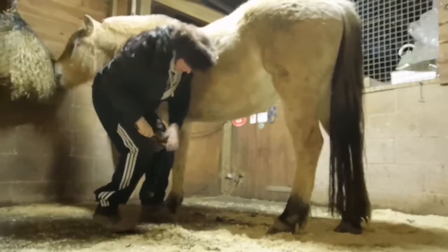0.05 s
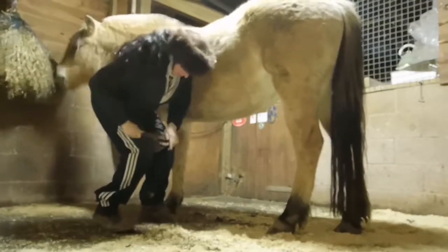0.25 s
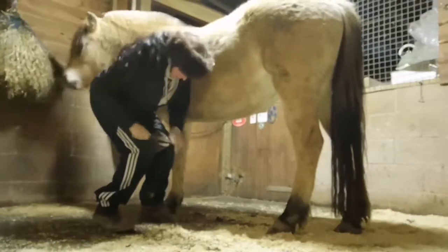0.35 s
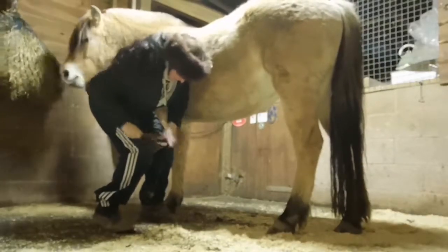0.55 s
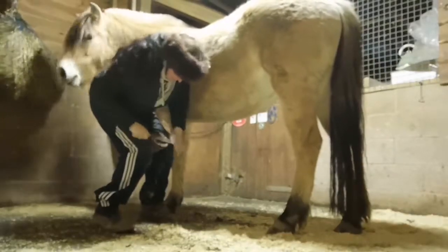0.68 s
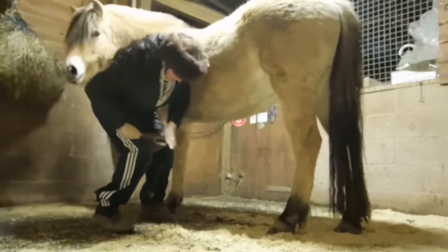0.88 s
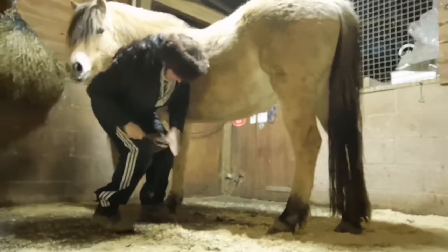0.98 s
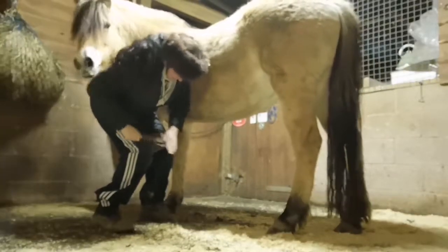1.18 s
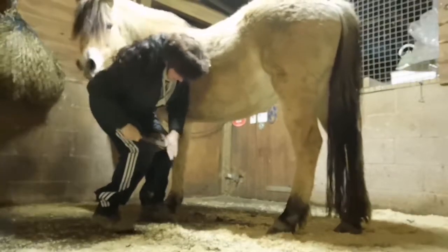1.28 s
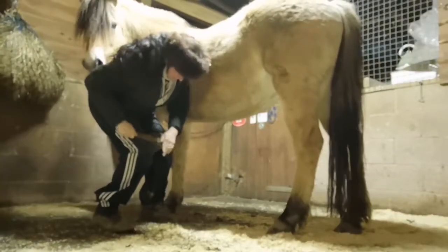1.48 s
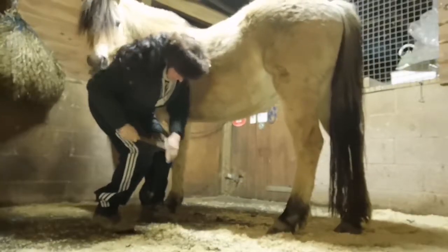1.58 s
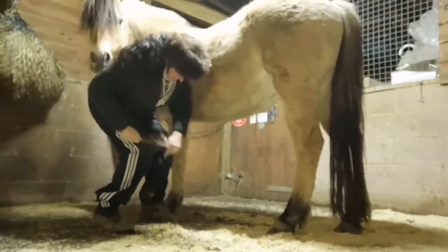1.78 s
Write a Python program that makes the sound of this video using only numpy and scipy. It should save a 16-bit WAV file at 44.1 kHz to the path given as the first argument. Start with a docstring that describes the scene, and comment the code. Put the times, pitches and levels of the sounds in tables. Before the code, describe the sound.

A metal rasp works on a horse's hoof in a quiet stable. After faint hiss and low rumble, it touches with a dull thud at 0.15 seconds and a bright ringing clink at 0.2, then smaller knocks until 0.4. Dry, gritty scrapes follow about every 0.16 seconds until 1.37, with hollow low judder. Near quiet follows, then one lighter scrape at 1.7. Short stall reflections.

```python
"""A quiet stable: a steel rasp is set on a hoof, clinks against metal and is then worked to and fro.
Its teeth scrape the horn in dense tiny clicks, ring the damped bar and shake the hoof into a low judder.
Blows crack, ring the bar and thud on the hoof; the work also sends a dull low push through leg and floor.
The stall adds a short tail of reflections. Below lie a faint hiss, a wavering hum and a deep rumble,
with two spaced microphones hearing nearly the same bass."""
import sys
import numpy as np
from scipy import signal
from scipy.fft import rfft, irfft
from scipy.io import wavfile
from scipy.ndimage import uniform_filter1d

SR = 44100
rng = np.random.default_rng(int(sys.argv[2]) if len(sys.argv) > 2 else 0)


def to_wav(s):
    """Save 16-bit WAV."""
    ch = np.atleast_2d(s).T  # columns
    pcm = np.round(np.clip(ch, -1, 1) * 32767)  # PCM
    wavfile.write(sys.argv[1], SR, pcm.astype(np.int16))


N = 81585
T = np.arange(N) / SR  # time of each sample [s]
HZ = np.fft.rfftfreq(N, 1 / SR)  # frequency of each spectrum bin [Hz]


def amp(db):
    """Turns decibels into a gain."""
    return 10 ** (np.asarray(db) / 20)


def evened(x):
    """Scales a sound to an average (rms) strength of 1."""
    return x / np.sqrt(np.mean(x ** 2) + 1e-20)


def noise(*size):
    """Plain random noise."""
    return rng.standard_normal(size)


def read(points, hz):
    """Reads a curve between its points, along a logarithmic frequency axis."""
    f, value = np.transpose(points)
    return np.interp(np.log(hz + 1), np.log(f + 1), value)


def shape(x, gain):
    """Filters a sound by a gain for each frequency."""
    return irfft(rfft(x) * gain, N)


def pair(a, b):
    """Mixes two streams into left and right, as alike as the two microphones hear each pitch."""
    # How alike left and right are: (frequency [Hz], likeness [-1 to 1])
    likeness = [(60, 1), (230, 1), (340, -.8), (600, -.5), (1000, 0), (1450, -.5), (2400, .1), (4400, -.1),
                (14900, 0)]
    # How much louder the left is: (frequency [Hz], left over right [dB])
    left_excess = [(60, 0), (220, 0), (380, 1.5), (700, 3), (1290, -1), (2370, 3.5), (4380, 0), (8080, -2),
                   (14900, 0)]
    same = np.clip(read(likeness, HZ), -1, 1)
    lean = amp(read(left_excess, HZ) / 2)
    left = shape(a, lean)
    right = shape(a, same / lean) + shape(b, np.sqrt(1 - same ** 2) / lean)
    return np.array([left, right])


def stall(x):
    """The walls send back sparse random reflections, and each pitch dies away at its own speed."""
    # Time the reflections take to fall by 60 dB: (frequency [Hz], time [s])
    decay_times = [(200, 0.1), (1000, 0.19), (4000, 0.18), (12000, 0.13)]
    # one reflection at a random place in every 20 samples
    slots = np.arange(250, SR // 2, 20)
    places = slots + rng.integers(0, 20, (2, len(slots)))
    signs = rng.choice([-1., 1.], (2, len(slots)))
    taps = np.zeros((2, SR // 2 + 20))
    np.put_along_axis(taps, places, signs, 1)
    hz, t, z = signal.stft(taps, SR, nperseg=256)
    fade = amp(-60 * t / read(decay_times, hz)[:, None])
    tail = signal.istft(z * fade, SR, nperseg=256)[1]
    return signal.fftconvolve(x, tail / np.linalg.norm(tail[0]), axes=1)[:, :N]


def air():
    """Noise is filtered into an uneven hiss, a wavering hum and a rumble; the last two are equal in both ears."""
    # Colour of the hiss: (frequency [Hz], relative level [dB])
    hiss_colour = [(12, -34), (20, -14), (82, 4), (132, -11.5), (331, -14.5), (413, -18.5), (577, -23.5),
                   (1160, -23.5), (1520, -24.5), (5470, -33), (5950, -36), (7640, -27), (15300, -50.5)]
    # Deep rumble before a 0.5 dB lift: (time [s], level [dB])
    rumble_level = [(0.0, -63), (0.246, -59), (0.4, -46), (0.432, -54.5), (0.602, -45), (0.658, -56),
                    (1.216, -47.5), (1.23, -59), (1.85, -54.5)]
    hiss_db, drift_db = -58, 1.
    hum_hz, hum_width_hz, hum_db = 107.3, 14, -60.5
    drift = evened(shape(noise(N), HZ < 8))  # slow ups and downs
    hiss = shape(noise(2, N) * amp(drift_db * drift), amp(read(hiss_colour, HZ)) * (HZ > 20))
    hiss = amp(hiss_db) * evened(pair(*hiss))
    hum = evened(shape(noise(N), 1 / (1 + (2 * (HZ - hum_hz) / hum_width_hz) ** 2)))
    rumble = evened(shape(noise(N), (HZ > 18) / (1 + (HZ / 45) ** 3)))
    rumble *= amp(np.interp(T, *np.transpose(rumble_level)) + 0.5)
    return hiss + amp(hum_db) * hum + rumble


def push():
    """Dull noise around 125 Hz that the work sends through the leg and floor."""
    # Strength of the push: (time [s], level [dB])
    push_level = [(0.15, -52), (0.172, -58), (0.262, -86), (0.32, -54.5), (0.376, -76), (0.41, -59.5),
                  (1.1, -56), (1.158, -39), (1.2, -61.5), (1.66, -70), (1.796, -54.5), (1.85, -79)]
    low = evened(shape(noise(N), 1 / (1 + ((HZ - 125) / 45) ** 4)))
    return low * amp(np.interp(T, *np.transpose(push_level), left=-90))


def judder():
    """The hoof shakes in a narrow wandering band: returns the shaking at even strength, and its gain."""
    # Shaking of the hoof: (time [s], level [dB], frequency [Hz])
    hoof_shaking = [(0.15, -76, 216.7), (0.164, -52.5, 218.2), (0.238, -66, 218), (0.414, -67, 205.2),
                    (0.556, -50.5, 225.3), (0.604, -90, 218.5), (0.666, -49, 225.3), (0.688, -47, 225.3),
                    (0.722, -41, 224.4), (0.756, -64, 224.4), (0.84, -41, 227.5), (0.916, -48, 232.2),
                    (0.936, -65, 226), (0.954, -49, 225.2), (1.062, -58, 225), (1.12, -35, 220.2),
                    (1.214, -48.5, 226.4), (1.248, -68, 222), (1.294, -50, 226.7), (1.348, -48, 226.2),
                    (1.466, -72, 211.3), (1.48, -66, 209.4), (1.722, -72.5, 204.5), (1.806, -53, 218.9),
                    (1.85, -61, 205.6)]
    width_hz = 47  # width of each of the two smoothing stages
    s, db, hz = np.transpose(hoof_shaking)
    turn = np.exp(2j * np.pi * np.cumsum(np.interp(T, s, hz)) / SR)
    r = np.exp(-np.pi * width_hz / SR)
    slow = signal.lfilter([1], [1, -2 * r, r * r], noise(N) + 1j * noise(N))
    shake = (turn * slow / abs(slow) ** .6).real  # the division calms the swings in strength
    return evened(shake), amp(np.interp(T, s, db, left=-90))


def arch(start, length, peak):
    """Pressure of one stroke: up to its peak and down again."""
    u = np.clip((T - start) / length, 0, 1)
    peak = np.clip(peak, .05, .95)
    return np.sin(np.pi / 2 * np.minimum(u / peak, (1 - u) / (1 - peak)))


def patchy(x):
    """The colour shifts in random patches of time and pitch as other teeth meet the horn."""
    patchy_db = 3.
    z = signal.stft(x, nperseg=256)[2]
    spots = noise(*z.shape[1:])
    spots = uniform_filter1d(spots, size=3, axis=0)
    spots = evened(uniform_filter1d(spots, size=10, axis=1))
    return signal.istft(z * amp(patchy_db * spots), nperseg=256)[1][:, :N]


def rasp():
    """Teeth bite in dense clicks, pulsed by the judder of the hoof, and ring the held bar."""
    # Strokes and light drags: (start [s], length [s], level [dB], body [dB], treble [dB],
    # place of the peak [0-1], ring [dB])
    strokes = [(0.152, 0.17, -49.5, -8.5, -31.5, .06, 2.5), (0.284, 0.18, -54, -7, 4, 0.29, -3.5),
               (0.444, 0.15, -41.5, 1, 1.5, 0.49, -3), (0.609, 0.14, -44, 6, 0, 0.66, 2.5),
               (0.766, 0.13, -39.5, 5.5, 3.5, 0.63, -2.5), (0.922, .14, -42.5, 5, 0, 0.52, 2),
               (1.064, 0.14, -38.5, 3, 2, 0.56, -5), (1.247, 0.12, -43.5, 4, -2.5, 0.55, -4),
               (1.365, 0.086, -65.5, 4, -5, .3, -4.5), (1.458, 0.27, -66.5, -1, -0.5, 0, -10.5),
               (1.705, 0.15, -44.5, -9, -0.5, 0.28, 2)]
    # Colour of the scraping: (frequency [Hz], relative level [dB])
    scrape_colour = [(160, -24.5), (280, -2.5), (326, -14), (529, -6), (790, -15.5), (935, -11.5),
                     (1330, -12.5), (2470, -3.5), (3170, -11.5), (3940, -14), (7700, -14), (15300, -40.5)]
    # Resonances of bar and horn under the teeth: (frequency [Hz], width [Hz], level [dB])
    held_modes = [(404.9, 50, 7.5), (514, 29, -4.5), (1015, 14, -4), (1162, 42, 3.5), (1583, 99, -2.5),
                  (1760, 130, 0), (2420, 97, 0.5), (3810, 400, 2), (4320, 63, 2.5), (5480, 42, 0),
                  (7020, 72, -15), (7910, 270, -5)]
    bites_per_s, bite_spread_db, judder_depth = 9000, 1.6, 0.1
    body_hz, treble_hz = 900, 4640  # body lies below the first, treble above the second
    grip_spread_db = 2.5  # each stroke rings the held bar a little differently
    ring_power, hiss_power = .6, 1.2  # the ring follows the pressure flatly, the hiss steeply
    wet_db = -7

    sizes = amp(bite_spread_db * np.minimum(rng.exponential(1, (2, N)), 4))
    bites = sizes * rng.choice([-1., 1.], (2, N)) * (rng.random((2, N)) < bites_per_s / SR)
    shake, shake_level = judder()
    bites = evened(bites) * (1 + judder_depth * shake)

    colour = amp(read(scrape_colour, HZ))
    colour = colour / np.sqrt(np.mean(colour ** 2))
    held = np.array([amp(db) / (1 + 2j * (HZ - f) / width) for f, width, db in held_modes])
    grips = amp(grip_spread_db * noise(len(strokes), len(held_modes)))
    low = 1 / (1 + (HZ / body_hz) ** 4)
    high = 1 / (1 + (treble_hz / (HZ + 1)) ** 4)

    teeth = np.zeros((2, N))
    for (start, length, db, body_db, treble_db, peak, ring_db), grip in zip(strokes, grips):
        press = arch(start, length, peak)
        tone = colour * amp(db + body_db * low + treble_db * high)
        teeth += shape(bites * press ** ring_power, tone * (grip @ held) * amp(ring_db))
        teeth += shape(bites * press ** hiss_power, tone)
    teeth = patchy(teeth)
    return pair(*(teeth + amp(wet_db) * stall(teeth))) + shake * shake_level


def blows():
    """Each blow cracks, rings the bar (soft contacts mostly its low modes), rattles and thuds on the hoof."""
    # Blows on the bar: (time [s], bar level [dB], contact roll-off [Hz],
    # struck on edge or face [above 0.5 = face], crack [dB], thud [dB])
    hits = [(0.156, -71, 4450, 1, -77, -51), (.1642, -41, 4200, 1, -60, -30),
            (.2074, 0, 30000, 0, -28, -52), (.3075, -34, 2600, 1, -48, -45),
            (.3340, -34, 20000, 1, -41, -48), (.385, -42.5, 2591, 0.64, -66, -61)]
    # Bending modes of the bar; an edge blow adds a snap that the grip kills at once. A t60 is the time
    # to fall by 60 dB: (frequency [Hz], snap [dB], snap t60 [s], ring on edge [dB], ring on face [dB],
    # ring t60 [s], left over right [dB], left lead [rad])
    bar_modes = [(1570, -40, .03, -50, -10, .1, 2, 2.5), (2150, -30, .03, -44, -10, .1, 3, 2),
                 (2400, -27, .03, -42, -4, .14, 4, 1.9), (3264, -40, .03, -33, -12, .25, 4, -1.2),
                 (4362, -22, .045, -38, -10, .16, 4, 2.7), (5525, -25, .04, -33, -5, .16, -3, -1.9),
                 (5688, -25, .04, -37, -10, .17, -2, -1.9), (6937, -11, .05, -34, 1, .17, -12, -2.3),
                 (7750, -24, .03, -40, -13, .12, -8, -2.3), (8351, -1, .022, -29, -7, .18, -7, 1.1),
                 (9647, -36, .04, -38, -12, .15, 9, .3), (9900, -30, .03, -44, -16, .08, 5, .3),
                 (11200, -29, .045, -55, -40, .1, -2, -2.9), (13740, -39, .04, -48, -26, .12, 3, 3)]
    # Colour of the crack: (frequency [Hz], relative level [dB])
    crack_colour = [(800, -31), (2300, -1), (5000, -8.5), (8000, 4), (10000, -0.5), (10800, -32.5),
                    (15000, -40)]
    # Thud gain, one row per side, left then right: (gain [times])
    thud_sides = [
        [1.],
        [-.5],
    ]
    contact_s = .0019  # sets how softly ring and crack swell
    chatter_db, chatter_t60 = -43, .12  # the bar rattles against the horn; t60 in s
    crack_t60, thud_hz, thud_t60 = .15, 480, 0.037  # t60 in s
    wet_db = -11

    out = np.zeros((2, N + SR))
    t = T[:SR // 2]
    hz, snap_db, snap_t60, edge_db, face_db, t60, lean_db, lead = np.array(bar_modes).T[:, :, None]
    side = np.array([.5, -.5])[:, None, None]
    rise = 1 - np.exp(-(t / contact_s) ** 2)
    on_edge = amp(snap_db - 60 * t / snap_t60) + amp(edge_db - 60 * t / t60)
    on_face = amp(face_db - 60 * t / t60)
    grit = evened(shape(noise(len(hits), 2, N), amp(read(crack_colour, HZ))))[:, :, :len(t)]
    rattle = noise(len(hits), len(bar_modes), len(t)) * amp(chatter_db - 60 * t / chatter_t60)

    for (s, level_db, soft_hz, face, crack_db, thud_db), rough, knocks in zip(hits, grit, rattle):
        size = amp(side * lean_db) / (1 + (hz / soft_hz) ** 4)
        size = size * (on_face if face > .5 else on_edge)
        ring = size * np.sin(2 * np.pi * hz * t + side * lead)
        # each knock of the rattle starts the ring again
        rattling = signal.fftconvolve(ring, knocks[None] * rise, axes=2)[:, :, :len(t)]
        bar = (ring * rise + rattling).sum(1)
        thud = amp(thud_db - 60 * t / thud_t60) * np.sin(2 * np.pi * thud_hz * t) * thud_sides
        crack = amp(crack_db - 60 * t / crack_t60) * rough * rise
        at = round(s * SR)
        out[:, at:at + len(t)] += amp(level_db) * bar + thud + crack
    out = out[:, :N]
    return out + amp(wet_db) * stall(out)


def scene():
    """Air, low push, strokes and blows together."""
    return air() + push() + rasp() + blows()


def record(dry):
    """Cuts the highest treble with a steep filter, as the sound is band-limited."""
    edge_hz = 15150
    low_pass = signal.firwin(511, edge_hz, window=("kaiser", 9), fs=SR)
    return signal.oaconvolve(dry, low_pass[None], "same")


dry = scene()
out = record(dry)
to_wav(out)
```